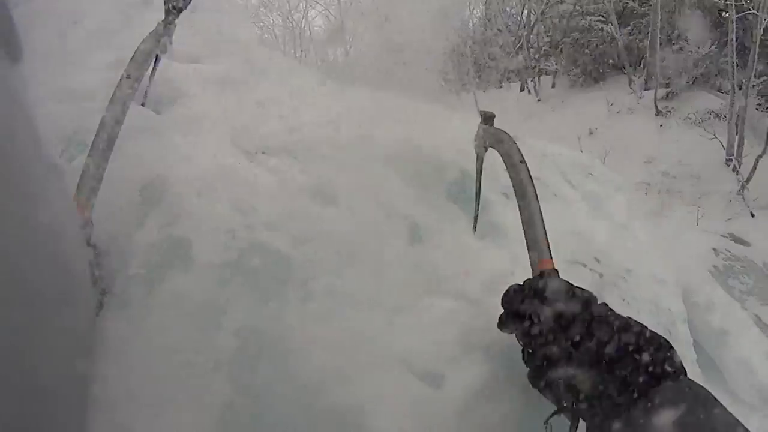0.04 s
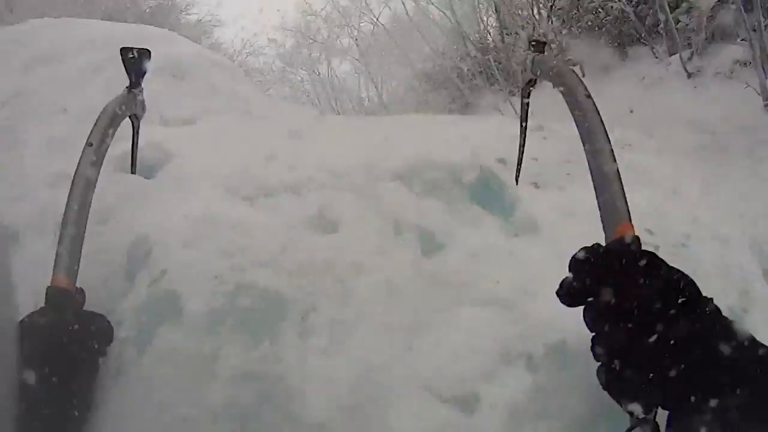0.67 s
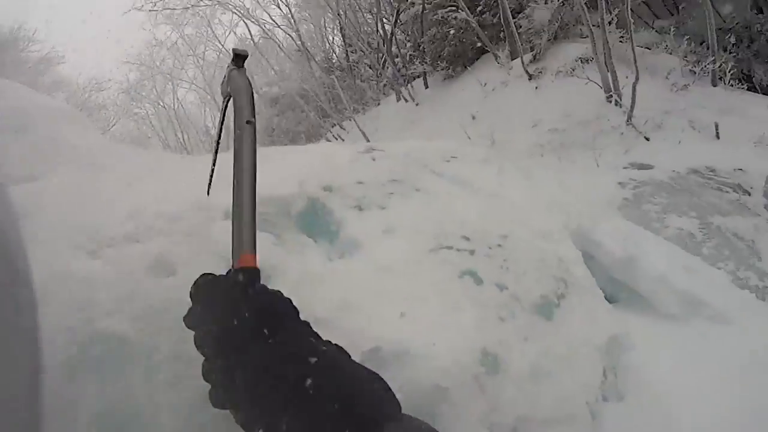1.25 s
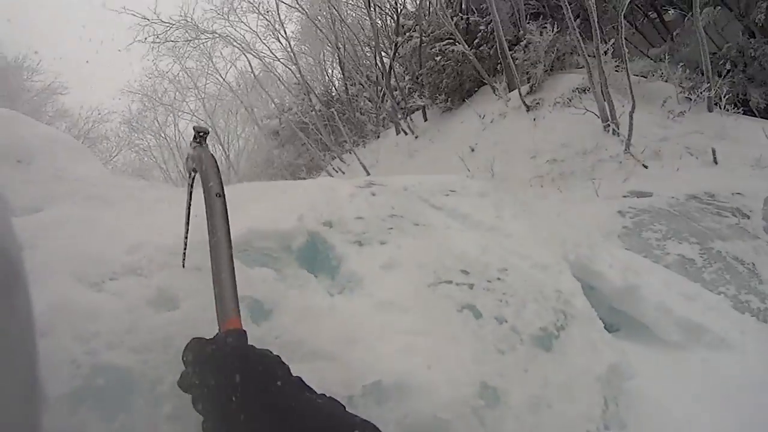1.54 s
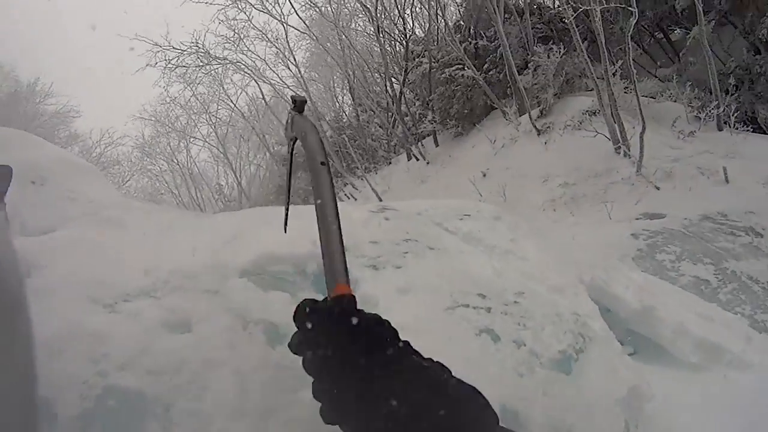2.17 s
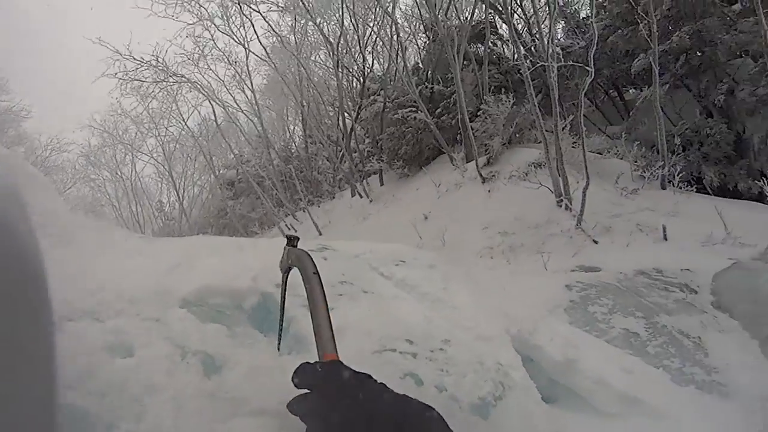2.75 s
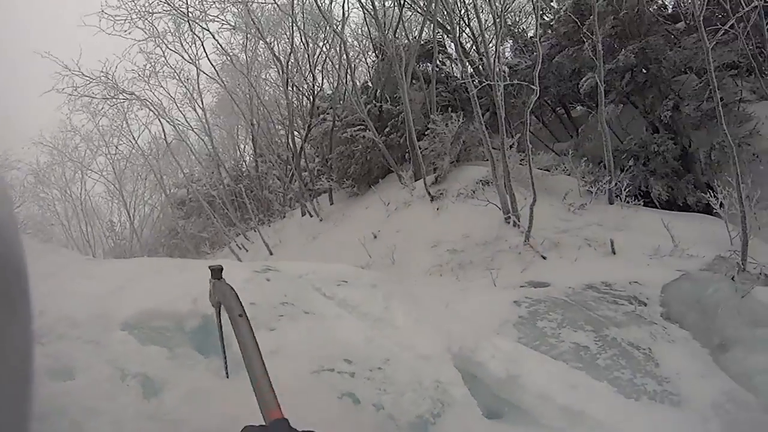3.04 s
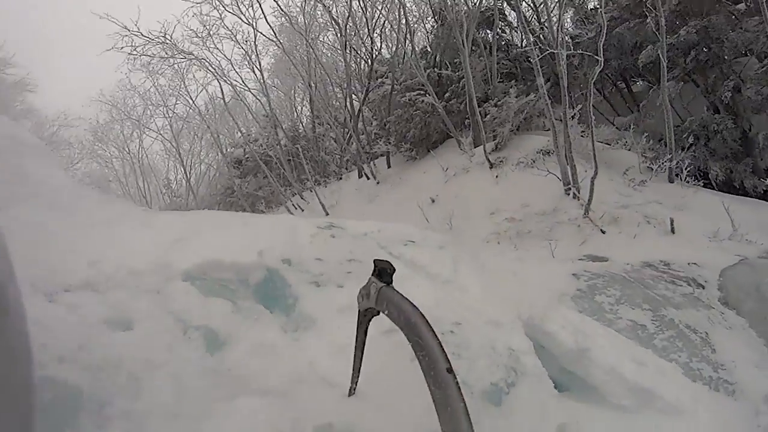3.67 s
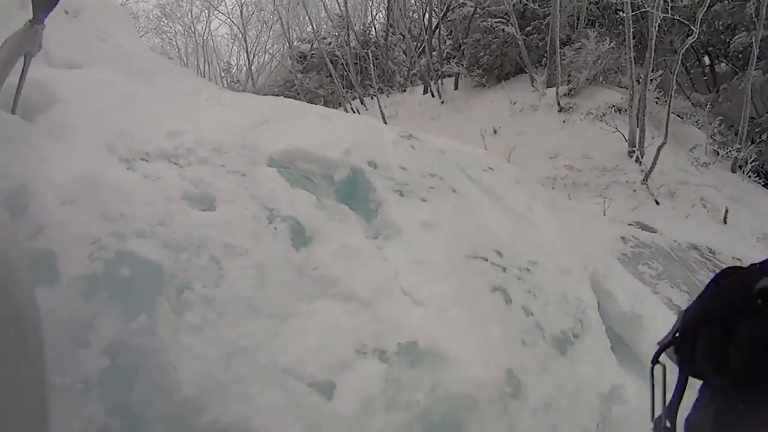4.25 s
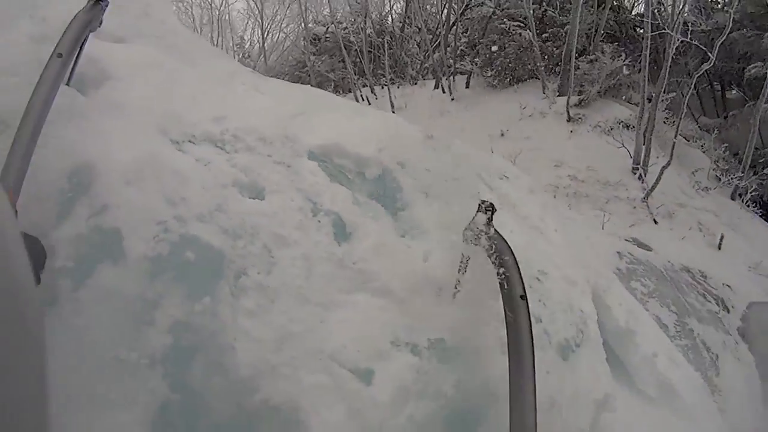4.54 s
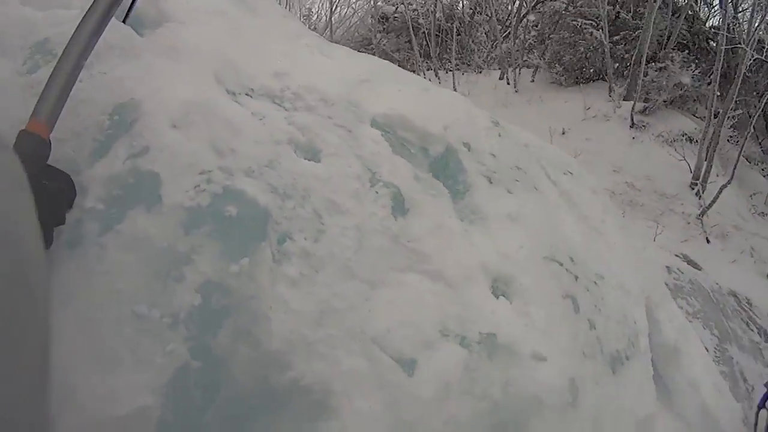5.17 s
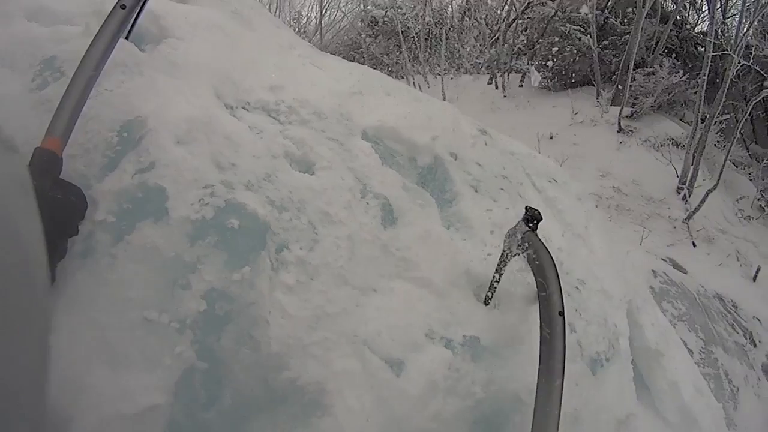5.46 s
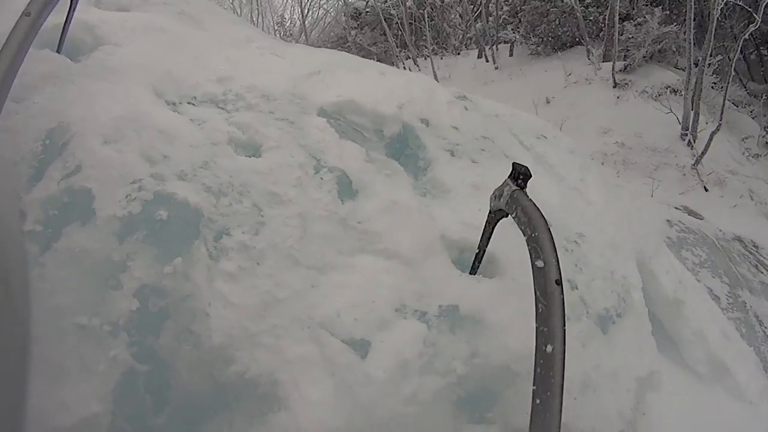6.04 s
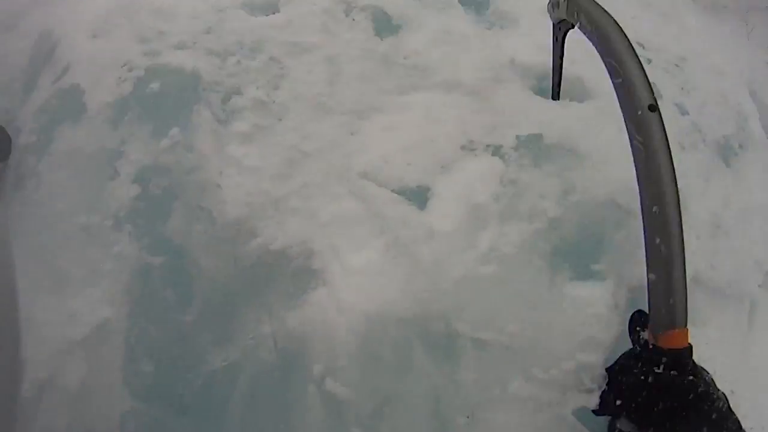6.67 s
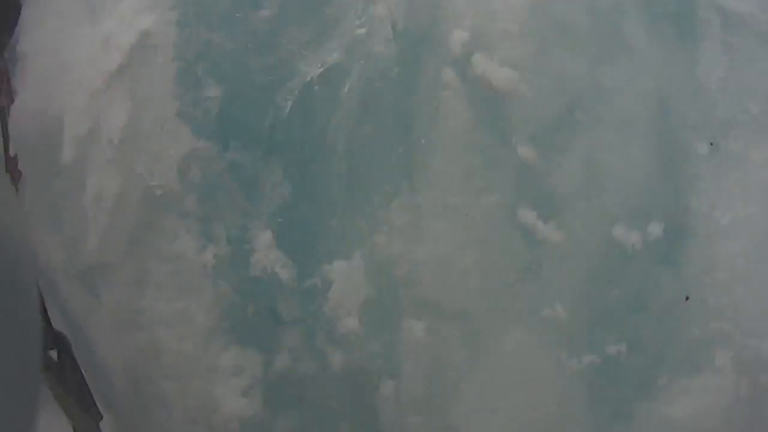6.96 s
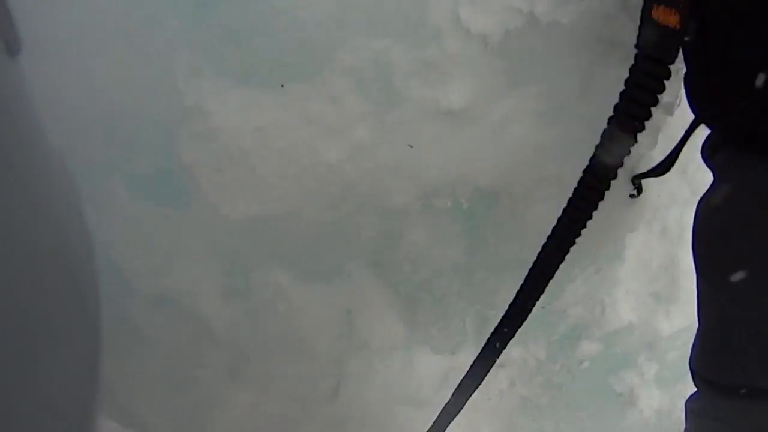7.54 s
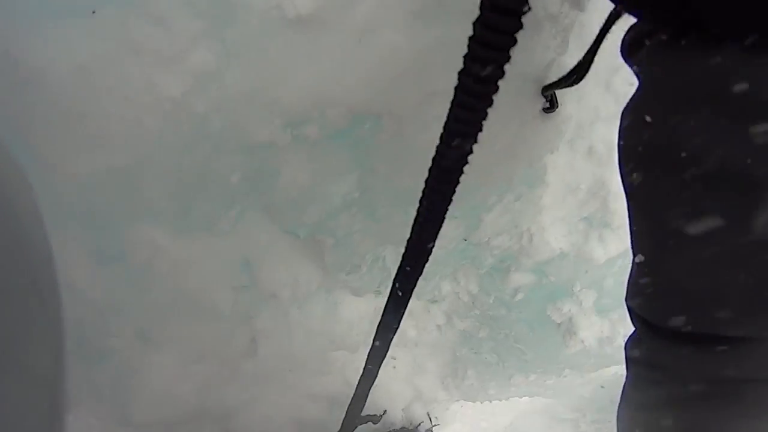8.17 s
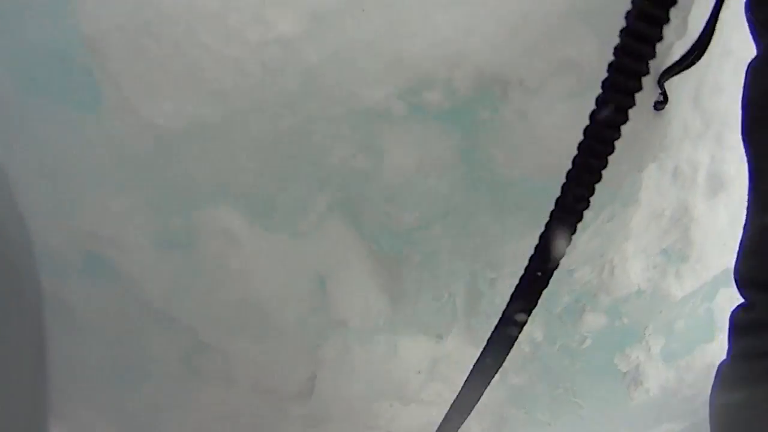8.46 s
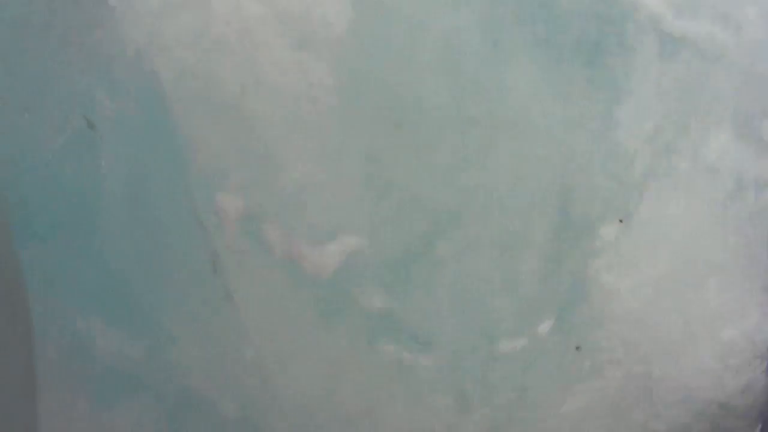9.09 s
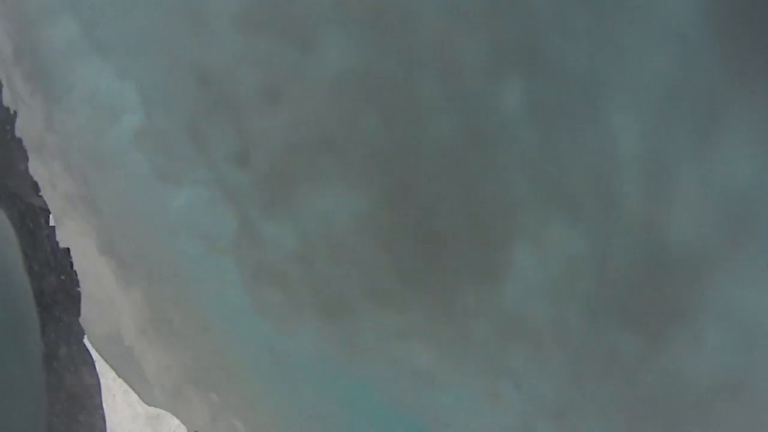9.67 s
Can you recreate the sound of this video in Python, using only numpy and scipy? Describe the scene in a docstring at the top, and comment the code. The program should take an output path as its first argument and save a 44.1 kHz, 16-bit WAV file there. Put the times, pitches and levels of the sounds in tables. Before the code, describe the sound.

Close, head-worn sound of ice climbing outdoors in light wind. Axe picks chop into ice with short knocks and slightly ringing shafts while powder hisses and crumbs patter on the microphone. After a quieter stretch of rustling cloth, small scrapes and clinking gear, louder strikes land and a pick squeaks in its hole. The rustling hiss rises and fades, a crampon kick thuds deeply, and hard crunching blows come last.

```python
"""On a snowy frozen waterfall, a climber swings two axes and kicks in crampons, heard from a head camera.
Impacts fracture the ice and set the shafts ringing; steel points crunch, creak by stick-slip and scrape.
Crumbs, chips and powder strike the camera's case, whose resonances colour their taps and hiss.
Hanging steel gear clinks, a jacket rustles, and turbulent wind murmurs in the trees above."""
import sys
import numpy as np
from scipy import signal
from scipy.fft import rfft, irfft, next_fast_len
from scipy.io import wavfile
from scipy.ndimage import uniform_filter1d, map_coordinates

SR = 44100
rng = np.random.default_rng(int(sys.argv[2]) if len(sys.argv) > 2 else 0)


def materialize(psi):
    """Save the field psi as 16-bit PCM at rate SR to the path in sys.argv[1].

    A 1-D psi becomes a single channel; in a 2-D psi each row is a channel.
    """
    bounded = np.clip(np.atleast_2d(psi).T, -1, 1)
    quanta = np.round(bounded * 32767).astype(np.int16)
    wavfile.write(sys.argv[1], SR, quanta)


N = 433062
EVENT_N = SR // 3
CLOCK = np.arange(EVENT_N) / SR  # seconds within one event

# steel points crushing ice: start_s, length_s, body_db, grit_db
CRUNCHES = [(3.36, 0.066, -37.5, -35.5), (3.461, 0.015, -33, -37.5), (3.509, 0.0097, -32.5, -39.5),
            (4.391, 0.042, -38, -44), (4.584, 0.029, -32.5, -40), (5.396, 0.03, -29.5, -21.5),
            (6.17, 0.036, -36, -33), (6.426, 0.03, -31.5, -36), (8.559, 0.051, -34, -34.5),
            (8.623, 0.069, -40, -35.5), (8.783, 0.043, -32.5, -35.5), (8.815, 0.026, -27, -36),
            (9.003, 0.024, -35, -36), (9.097, 0.033, -30, -43), (9.748, 0.016, -24, -22)]


def blows(fracture_t60=0.019, crumble=2.3, seat_s=0.0013, tail_db=-25, tail_t60=0.45):
    """Brittle fracture: a sinking point excites a resonance of the ice and the shaft's damped modes."""
    # axe and boot blows: start_s, body_db, thud_db, knock_db, crack_db, sink_s, pitch_hz
    strikes = [(0.0014, -15, -55, -31.5, -18.5, 0.0048, 1400), (0.4872, -17, -31.5, -23, -26, 0.0021, 1240),
               (0.9647, -25.5, -31, -30.5, -51, 0.0041, 1750), (1.2358, -18, -32, -28, -27.5, 0.0017, 1690),
               (4.4464, -15, -59, -33.5, -17, 0.014, 1930), (4.5057, -31.5, -47, -28, -55, 0.0015, 1580),
               (4.8298, -9, -34, -15.5, -25.5, 0.00039, 1290), (5.3879, -18.5, -58, -29, -25, 0.0036, 1420),
               (5.3983, -10, -58, -22.5, -36, 0.013, 1800), (5.8163, -9, -47, -19, -16.5, 0.0059, 1960),
               (5.9032, -38, -32, -26.5, -54, 0.00073, 1740),
               (6.4484, -10.5, -32, -15.5, -33.5, 0.01, 1410),
               (8.6767, -13.5, -26.5, -30, -21.5, .002, 1630), (8.8426, -26, -62, -30.5, -35, 0.0039, 1450),
               (9.7394, -7.5, -25.5, -19, -19, 0.0061, 1330), (9.761, -8, -33, -24, -15, 0.014, 1470),
               (9.7927, -20.5, -38, -24, -22.5, 0.0025, 1850)]
    # spectrum of breaking ice: frequency_hz, level_db
    ice_spectrum = [(35, -44), (60, 4.5), (336, 5.5), (690, -11.5), (936, -20), (1450, -10.5),
                    (2290, -23.5), (3040, -21.5), (3700, -31), (4310, -23.5), (5360, -33.5), (7270, -37),
                    (11000, -49.5), (14300, -94), (22000, -120)]
    # shaft modes: frequency_hz, level_db, t60_s
    shaft_modes = [(410, -20, 0.11), (682, 8, 0.25), (794, 10, 0.22), (990, -9, .1), (1080, -5, 0.17),
                   (1260, -14, 0.083), (1520, -23, 0.1), (1720, -12, 0.095), (2200, -19, 0.082),
                   (2670, -18, .1), (3100, 3, 0.12)]
    out = np.zeros((2, N))
    frontal = amp([[0], [-2]])  # less side than mid: the source is ahead
    for start, body_db, thud_db, knock_db, crack_db, sink_s, pitch_hz in strikes:
        seated = sink_s / (sink_s + seat_s)  # a glancing pick hardly rings ice or shaft
        t60 = fracture_t60 + crumble * sink_s  # a deep bite crumbles longer
        force = decay(t60, hold_s=sink_s) + seated * amp(tail_db) * decay(tail_t60)
        fracture = frontal * force * patches(noise(EVENT_N), depth_db=3)
        ice = spread(fracture, lambda hz: along(ice_spectrum, hz) + 7 * resonance(hz, pitch_hz, 130))
        add(out, start, at_peak(band(ice, 380, "low"), thud_db))
        add(out, start, at_peak(band(ice, [740, 1150], "band"), knock_db))
        add(out, start, at_peak(band(ice, [1050, 2200], "band"), body_db - 2))
        add(out, start, at_peak(band(ice, 2110, "high"), crack_db - 1))
        grip = amp(rng.normal(0, 1, len(shaft_modes)))  # the glove damps each blow differently
        gripped = [(hz, db, life * g) for (hz, db, life), g in zip(shaft_modes, grip)]
        add(out, start, seated * at_peak(ring(gripped), knock_db - 10))
    return out


def crunches():
    """Acoustic emission: points grinding in release dense micro-fractures until they hold."""
    # frequency_hz, gain_db
    tilt = [(500, 2), (1400, 5), (2500, 3), (4700, -7), (7000, 1.5), (10000, 0.5)]
    out = np.zeros((2, N))
    for start, length, body_db, grit_db in CRUNCHES:
        fractures = patches(grains(EVENT_N, per_s=4000, scatter_db=3), depth_db=3.5)
        push = stroke(length, rise_s=0.0016, release_t60=0.04) * fractures
        ice = spread(push, lambda hz: case(hz) + along(tilt, hz))
        add(out, start, at_peak(band(ice, 2000, "low"), body_db + 3))
        add(out, start, at_peak(band(ice, 3170, "high"), grit_db + 1))
    return out


def creaks(lead_s=0.002):
    """Stick-slip friction: steel slipping in cold ice excites a few narrow resonances."""
    # a pick levering in its hole: start_s, length_s, level_db
    levers = [(6.105, 0.017, -33), (6.139, 0.0045, -22), (6.151, 0.0035, -14.5), (6.172, 0.0051, -15),
              (6.179, 0.026, -21), (6.205, 0.021, -30), (6.32, 0.0034, -27.5), (6.555, 0.035, -36.5)]
    # squeak resonances: centre_hz, half_width_hz, level_db
    peaks = [(1470, 110, 2.5), (1820, 55, -5), (3300, 250, -21.5)]
    squeak = lambda hz: 20 * np.log10(sum(amp(db) * resonance(hz, f, w) for f, w, db in peaks))
    out = np.zeros((2, N))
    for start, length, db in levers:
        force = stroke(length, rise_s=0.00068, release_t60=0.045)
        slips = force * grains(EVENT_N, per_s=1700, scatter_db=2)
        add(out, start - lead_s, at_peak(spread(slips, squeak), db))  # resonances take time to build
    return out


def drags():
    """Roughness excitation: ice keeps the thin blade of a skating pick singing."""
    # a loose pick dragged over ice: start_s, length_s, level_db
    skids = [(3.365, 0.056, -40), (3.44, 0.071, -40.5), (4.072, 0.032, -61), (4.401, 0.009, -32)]
    # blade modes: frequency_hz, level_db, t60_s
    blade_modes = [(6500, -2, 0.078), (7020, 0, 0.11), (7400, -2.5, .06), (7920, -4, 0.058)]
    out = np.zeros((2, N))
    for start, length, db in skids:
        force = stroke(length, rise_s=0.0034, release_t60=0.057)
        rasp = force * grains(EVENT_N, per_s=1400, scatter_db=1)
        add(out, start, at_peak(excite(blade_modes, rasp), db))
    return out


def crumbs(rise_s=0.0017, tap_t60=0.0067, shatter_db=-30, shatter_t60=0.036):
    """Impact excitation: each crumb taps the case, pitched by where it lands, and breaks up."""
    # larger ice crumbs landing: start_s, body_db, treble_db, pitch_hz
    landings = [(0.2533, -13, -26, 1630), (0.2586, -15, -24, 1760), (0.4231, -16.5, -25, 1850),
                (0.6978, -14.5, -26.5, 1630), (0.7117, -22, -27.5, 1420), (0.8503, -15, -26, 3060),
                (0.9279, -11, -23, 1350), (1.0125, -21, -28.5, 1860), (1.0453, -26, -28, 1630),
                (1.5752, -17, -37.5, 1450), (1.6252, -14, -30, 1850), (1.6522, -11, -31, 1770),
                (1.6724, -30, -41, 2080), (1.8248, -22, -50, 1740), (1.9434, -22, -36.5, 1760),
                (1.9537, -35, -34.5, 1670), (2.0009, -24, -34.5, 1450), (2.0822, -27.5, -40, 1600),
                (2.5227, -18, -37, 1760), (2.5272, -17, -38.5, 3060), (2.5643, -13.5, -26, 1290),
                (2.606, -27, -37, 1660), (2.6306, -24, -35, 1780), (2.735, -15, -28.5, 1490),
                (5.3412, -21, -30, 1800), (5.5618, -32, -37, 1460), (5.6879, -16.5, -32, 2050),
                (5.723, -30, -39, 1400), (5.7423, -24, -31, 1780), (5.7543, -18, -24, 1670),
                (5.7658, -17, -24, 1720), (5.7761, -18, -26.5, 1740), (5.83, -11, -29, 1300),
                (5.886, -19, -37, 1850), (5.9118, -4, -35, 1670), (5.9345, -7, -30.5, 3180),
                (5.9607, -19, -40, 3130), (6.0437, -18.5, -42, 1720), (6.2636, -22, -38, 1500),
                (6.9486, -24.5, -34.5, 1510), (7.0293, -19.5, -34.5, 1810), (7.2148, -13.5, -26, 1450),
                (7.292, -17, -33, 1630), (7.3673, -21, -29.5, 1430), (7.5376, -22, -33.5, 1440),
                (7.8017, -25, -34, 1840), (7.9597, -19, -33, 1470), (8.2076, -28, -41, 1550),
                (8.3355, -22, -40, 1430), (8.3533, -28, -34.5, 1600), (8.5022, -30, -28.5, 3130),
                (8.5357, -10, -31.5, 3200), (8.5681, -8.5, -36, 1390), (9.4194, -31, -34.5, 1610)]
    out = np.zeros((2, N))
    onset = 1 - np.exp(-CLOCK / rise_s)
    force = onset * (decay(tap_t60) + amp(shatter_db) * decay(shatter_t60))
    for start, body_db, treble_db, pitch_hz in landings:
        tap = spread(force * noise(EVENT_N), lambda hz: case(hz) + 9 * resonance(hz, pitch_hz, 220))
        add(out, start, at_peak(band(tap, 2800, "low"), body_db - 8))
        add(out, start, at_peak(band(tap, 5870, "high"), treble_db + 6))
    return out


def chips(level_db=-47, fall_s=0.17):
    """Shot noise: chips loosened by each crunch patter down, quieter after a gentler bite."""
    t = np.arange(N) / SR
    hardest_db = max(body_db for _, _, body_db, _ in CRUNCHES)
    power = sum(amp(body_db - hardest_db) * (t > start) * np.exp(-np.abs(t - start) / fall_s)
                for start, _, body_db, _ in CRUNCHES)
    patter = spread(grains(N, per_s=35, scatter_db=3), case)
    return amp(level_db) * np.sqrt(power) * unit(band(patter, 1200, "high"))


def clinks(scuff_t60=0.019, chatter_t60=0.048):
    """Modal ringing: steel gear touches with a scuff, and chattering contacts drive its modes."""
    # hanging gear touching: start_s, level_db
    touches = [(3.2883, -23.5), (3.3922, -22), (3.469, -38), (3.7098, -22), (3.9807, -25.5), (4.097, -30.5),
               (4.204, -28), (4.4047, -23.5), (4.563, -29), (4.648, -27), (5.0515, -27), (5.1476, -19),
               (5.1791, -31), (6.3856, -22)]
    # gear modes: frequency_hz, level_db, t60_s
    gear_modes = [(1670, 6.5, 0.026), (3020, 6.5, 0.026), (3200, 8.5, 0.021), (3590, -2.5, 0.045),
                  (4160, -4, 0.041), (6830, -0.5, 0.031), (7450, -1, 0.029), (8240, -9.5, 0.03)]
    out = np.zeros((2, N))
    for start, db in touches:
        scuff = band(spread(decay(scuff_t60) * noise(EVENT_N), case), 1200, "high")
        chatter = decay(chatter_t60) * grains(EVENT_N, per_s=1800, scatter_db=6.5)
        add(out, start, at_peak(excite(gear_modes, chatter), db - 10) + at_peak(scuff, db - 16))
    return out


def clumps():
    """Fragmentation: a clump of snow falls apart into a brief shower of coarse grains."""
    # clumps bursting on the case: start_s, length_s, level_db
    bursts = [(0.222, 0.013, -24), (0.35, 0.12, -26), (0.626, 0.025, -24), (0.786, 0.045, -24.5),
              (0.873, 0.031, -30), (5.799, 0.011, -29), (7.135, 0.06, -29.5), (8.309, 0.021, -34.5),
              (9.589, 0.037, -35)]
    out = np.zeros((2, N))
    for start, length, db in bursts:
        force = stroke(length, rise_s=0.00077, release_t60=0.075)
        shower = force * grains(EVENT_N, per_s=1800, scatter_db=-1.5)
        add(out, start, at_peak(band(spread(shower, powder), 1450, "high"), db))
    return out


def snow_and_jacket(pour_db=-48):
    """Friction and granular flow: cloth rustles; as the hiss grows, grains on the case take over."""
    # spectrum of jacket fabric: frequency_hz, level_db
    jacket = [(1500, 7), (2400, 4), (3200, 8.5), (3900, -1), (5000, -7), (6000, -1), (7200, -3),
              (11000, -8)]
    rub_db, hiss_db = rustle_levels()
    pouring = .1 + .9 / (1 + np.exp((pour_db - hiss_db) / 3))  # the grains' share of the power
    mix = lambda grainy, soft: np.sqrt(pouring) * unit(grainy) + np.sqrt(1 - pouring) * unit(soft)
    flurry_db = 1.4 * wobble(110)
    fine = grains(N, per_s=6000, scatter_db=2)
    coarse = .95 * grains(N, per_s=260, scatter_db=4)
    flow = patches(fine + coarse, depth_db=3)
    ticks = .55 * patches(grains(N, per_s=40, scatter_db=2), depth_db=4)
    cloth = patches(noise(N), depth_db=2) * amp(1.2 * wobble(40))
    rub = unit(band(spread(mix(flow, cloth), powder), 1850, "low"))
    rattle = band(spread(flow + ticks, powder), 4470, "high")
    swish = band(spread(cloth, lambda hz: along(jacket, hz)), 2000, "high")
    return amp(rub_db + flurry_db / 2) * rub + amp(hiss_db + flurry_db) * mix(rattle, swish)


def rustle_levels():
    """Incoherent sources add in power: rub and hiss, in dB, swell with each shift of the body."""
    # steady sliding snow and rubbing cloth: time_s, hiss_db, rub_db
    sliding = [(0.0, -33.5, -36), (0.93, -34, -38.5), (1.17, -45, -42), (1.91, -49.5, -45),
               (3.03, -49.5, -45), (3.31, -50, -46.5), (3.83, -53, -50), (4.73, -53, -50.5),
               (5.11, -57, -57.5), (5.39, -53, -52), (5.52, -57, -50.5), (5.91, -46, -44.5),
               (6.26, -50, -49.5), (6.86, -49.5, -48.5), (7.19, -38, -42), (7.68, -43.5, -44.5),
               (7.96, -41, -46), (8.34, -49, -47.5), (8.67, -44, -36), (9.08, -48, -46.5), (9.46, -40, -44),
               (9.63, -36, -41.5), (9.82, -39, -37)]
    # shifts of the body: middle_s, length_s, rub_db, hiss_db
    moves = [(1.074, 0.087, -38, -35.5), (1.412, 0.043, -32.5, -47), (1.577, 0.024, -36, -61),
             (2.258, 0.053, -38, -54), (2.577, 0.1, -60, -51), (3.15, 0.13, -43, -51.5),
             (3.416, .13, -39, -47), (4.53, 0.079, -43.5, -51), (5.403, 0.052, -34, -42.5),
             (5.506, 0.16, -43, -47.5), (6.19, 0.11, -41, -47), (6.56, 0.094, -46.5, -47.5),
             (7.198, 0.18, -41.5, -36), (7.603, 0.047, -40.5, -38), (7.866, 0.087, -39.5, -37),
             (8.077, 0.14, -37.5, -46), (8.384, 0.12, -47, -54), (8.803, 0.11, -54, -45.5),
             (9.709, 0.04, -37.5, -32)]
    hiss_db, rub_db = curves(sliding)
    power = amp([rub_db, hiss_db - 2]) ** 2
    t = np.arange(-SR // 2, SR // 2) / SR
    for middle, length, rub, hiss in moves:
        bell = .5 ** ((2 * t / length) ** 2)
        add(power, middle + t[0], amp([[rub], [hiss]]) ** 2 * bell)
    return 10 * np.log10(power)


def jolt(start_s=8.68, length_s=0.089, level_db=-36, top_hz=70):
    """Structure-borne sound: a hard boot kick sends a deep shudder through climber and camera."""
    out = np.zeros((2, N))
    shake = stroke(length_s, rise_s=0.0082, release_t60=0.38) * rng.standard_normal((1, EVENT_N))
    add(out, start_s, at_peak(band(shake, top_hz, "low"), level_db))
    return out


def wind():
    """Turbulence: air murmurs in the trees and rumbles on the moving camera."""
    # gusts: time_s, rumble_db, trees_db
    gusts = [(0.0, -54, -50), (1.26, -48.5, -45), (1.72, -55, -52), (2.16, -51, -50.5), (2.95, -54, -49),
             (5.22, -62.5, -60.5), (5.44, -56.5, -57), (5.94, -61, -51), (6.37, -54, -51.5),
             (6.83, -57.5, -58), (8.81, -57.5, -60), (9.19, -53.5, -56), (9.46, -60.5, -67),
             (9.82, -57, -65)]
    # spectrum of air on the camera: frequency_hz, level_db
    rumble = [(12, -16), (20, -6), (103, 0), (195, -9), (300, -8), (390, -32.5), (660, -120)]
    # spectrum of air in the trees: frequency_hz, level_db
    trees = [(88, -36), (150, -3), (210, -9), (253, -2), (465, -5), (701, -1.5), (945, -11.5), (1080, 1),
             (1170, -5), (1400, -8), (1820, -40), (3080, -120)]
    rumble_db, trees_db = curves(gusts)
    buffet_db = 1.4 * wobble(9)
    rush = lambda spectrum: unit(spread(noise(N), lambda hz: along(spectrum, hz)))
    return amp(rumble_db + 2 + buffet_db) * rush(rumble) + amp(trees_db + 2) * rush(trees)


def case(hz):
    """Frequency response of the camera's case in dB: resonant humps on a slope."""
    # broad response: frequency_hz, gain_db
    slope = [(300, -14), (900, -14.5), (1250, -7), (2000, -10), (2400, -8.5), (3700, -11.5), (5500, -9),
             (8500, -13.5), (11000, -24)]
    # case resonances: centre_hz, width_hz, lift_db
    humps = [(1450, 290, 8), (1800, 485, 13), (3033, 770, 14.5), (4673, 1150, 17), (7150, 540, 5),
             (9640, 230, 6.5)]
    return along(slope, hz) + sum(db * resonance(hz, f, width / 2) for f, width, db in humps)


def powder(hz):
    """Cascaded responses add in dB: snow grains heard through the case."""
    # spectrum of snow grains: frequency_hz, level_db
    grain_spectrum = [(1000, -1.5), (1900, -0.5), (3000, -0.5), (3900, -0.5), (4800, -1.5), (6000, -0.5),
                      (7300, 2.5), (10000, 5)]
    return case(hz) + along(grain_spectrum, hz)


def spread(pair, gain_db):
    """Mid-side stereo: colour two signals, then take their sum and difference as left and right."""
    # side relative to mid: frequency_hz, gain_db
    width = [(60, -19.5), (130, -12), (330, -2.5), (620, 3.5), (1300, -8), (2200, -5), (3100, -1),
             (3800, 2.5), (4700, -9.5), (7000, 0.5), (11000, -1)]
    mid, side = colour(pair, lambda hz: gain_db(hz) + np.array([0 * hz, along(width, hz)]))
    return np.array([mid + side, mid - side])


def colour(x, gain_db):
    """Minimum-phase filter: folding the cepstrum makes the response gain_db(hz) causal."""
    size = 2 * next_fast_len(x.shape[-1] // 2 + SR // 20)
    hz = np.fft.rfftfreq(size, 1 / SR)
    cepstrum = irfft(np.log(amp(gain_db(hz)) + 1e-6))
    cepstrum[..., 1:size // 2] *= 2
    cepstrum[..., size // 2 + 1:] = 0
    return irfft(rfft(x, size) * np.exp(rfft(cepstrum)), size)[..., :x.shape[-1]]


def patches(x, depth_db):
    """Random spectral modulation: the colour shifts every few milliseconds, as grains hit new spots."""
    spectra = signal.stft(x, nperseg=256)[2]
    field = rng.standard_normal(spectra.shape[1:])
    for axis in (0, 1):
        field = uniform_filter1d(field, size=3, axis=axis)
    return signal.istft(spectra * amp(depth_db * unit(field)), nperseg=256)[1][:, :x.shape[1]]


def grains(size, per_s, scatter_db):
    """Poisson process: tiny impacts of scattered strength, simultaneous in two channels."""
    hit = rng.random(size) < per_s / SR
    strength = amp(scatter_db * np.clip(rng.standard_normal(size), -2, 2))
    return unit(hit * strength * rng.uniform(-1.12, 1, (2, size)))


def ring(modes):
    """Impulse response of damped modes, with new strengths and phases for each strike and channel."""
    out = np.zeros((2, EVENT_N))
    for hz, db, t60 in modes:
        strength = amp(db + rng.normal(0, 3.4, (2, 1)))
        phase = rng.normal(0, 0.7, (2, 1))
        out += strength * decay(t60) * np.sin(2 * np.pi * hz * CLOCK + phase)
    return out


def excite(modes, force):
    """Forced vibration: the force convolved with the modes' impulse response."""
    return signal.fftconvolve(force, ring(modes), axes=1)[:, :EVENT_N]


def resonance(hz, centre_hz, half_width_hz):
    """Lorentzian peak of height 1."""
    return 1 / (1 + ((hz - centre_hz) / half_width_hz) ** 2)


def decay(t60, hold_s=0):
    """Exponential decay after a hold: 60 dB every t60 seconds."""
    return amp(-60 * np.maximum(CLOCK - hold_s, 0) / t60)


def stroke(length_s, rise_s, release_t60):
    """Envelope of a force that builds, holds and lets go."""
    return (1 - np.exp(-CLOCK / rise_s)) * decay(release_t60, hold_s=length_s)


def noise(size):
    """Two channels of white noise."""
    return rng.standard_normal((2, size))


def wobble(knots_per_s):
    """A smooth curve through random knots."""
    knots = rng.standard_normal(int(N * knots_per_s / SR) + 4)
    return map_coordinates(knots, [np.arange(N) * knots_per_s / SR])


def band(x, hz, kind):
    """Third-order Butterworth filter."""
    return signal.sosfilt(signal.butter(3, hz, btype=kind, fs=SR, output="sos"), x)


def along(points, hz):
    """Interpolate (frequency_hz, value) points on a log axis."""
    frequencies, values = np.transpose(points)
    return np.interp(np.log(hz + 1), np.log(frequencies + 1), values)


def curves(rows):
    """Interpolate each column after the time to one value per sample."""
    times, *columns = np.transpose(rows)
    return [np.interp(np.arange(N) / SR, times, column) for column in columns]


def amp(db):
    """Decibels to gain."""
    return 10 ** (np.asarray(db) / 20)


def unit(x):
    """Scale to rms 1."""
    return x / np.sqrt(np.mean(x ** 2) + 1e-20)


def at_peak(x, db):
    """Scale so that the loudest two milliseconds have this rms level."""
    power = uniform_filter1d(np.mean(x ** 2, axis=0), size=88)
    return amp(db) * x / np.sqrt(power.max() + 1e-20)


def add(track, start_s, sound):
    """Superpose a sound on a track."""
    room = track[:, max(0, round(start_s * SR)):][:, :sound.shape[1]]
    room += sound[:, :room.shape[1]]


def scene():
    """Level difference between the channels: the axes lie a little left, the rest nearer the centre."""
    axes = blows() + crunches() + creaks() + drags()
    around = crumbs() + chips() + clinks() + clumps() + snow_and_jacket() + wind() + jolt()
    return axes * amp([[.8], [-.8]]) + around * amp([[.4], [-.4]])


def record(dry):
    """Soft saturation and band limiting: the camera rounds tall peaks and cuts the highest treble."""
    ceiling, top_hz = .85, 11200
    rounded = dry / (1 + (dry / ceiling) ** 6) ** (1 / 6)
    size = next_fast_len(N + SR // 2)
    hz = np.fft.rfftfreq(size, 1 / SR)
    return irfft(rfft(rounded, size) / (1 + (hz / top_hz) ** 60), size)[:, :N]


dry = scene()
out = record(dry)
materialize(out)
```